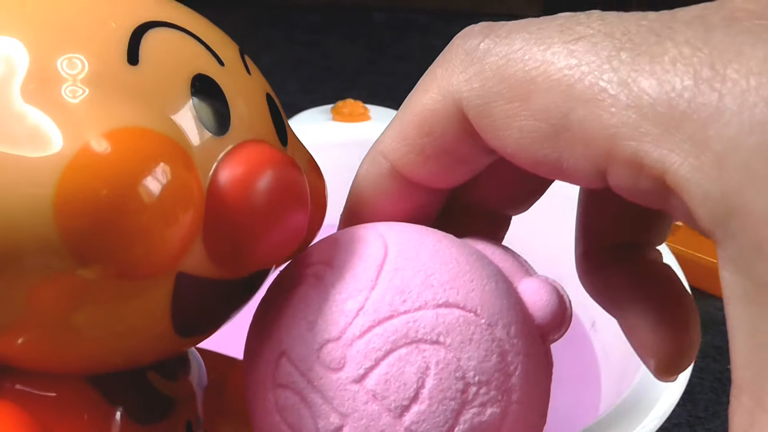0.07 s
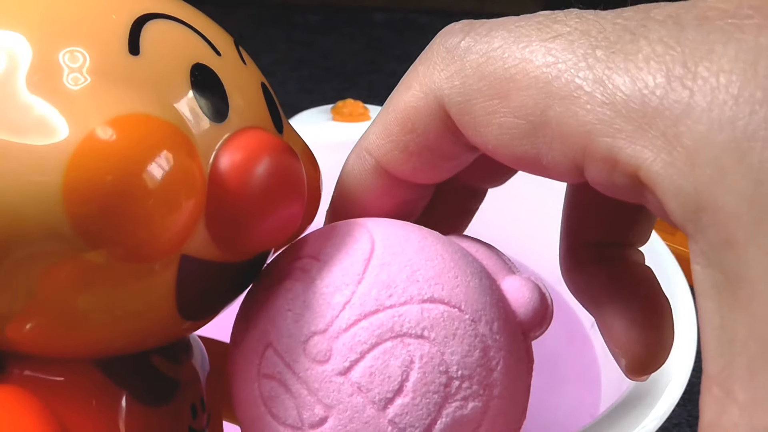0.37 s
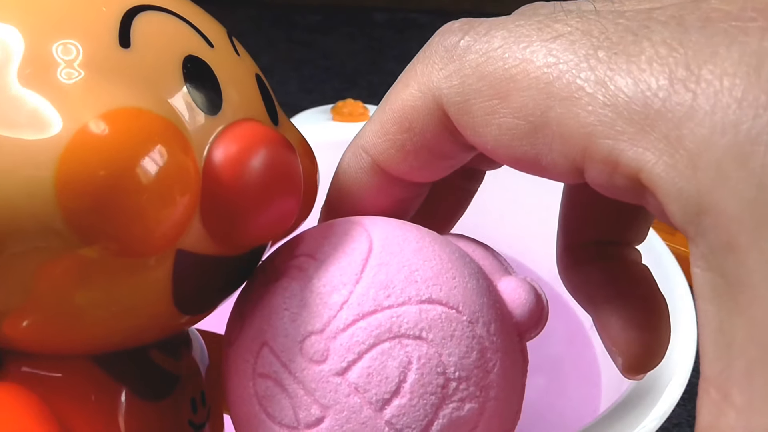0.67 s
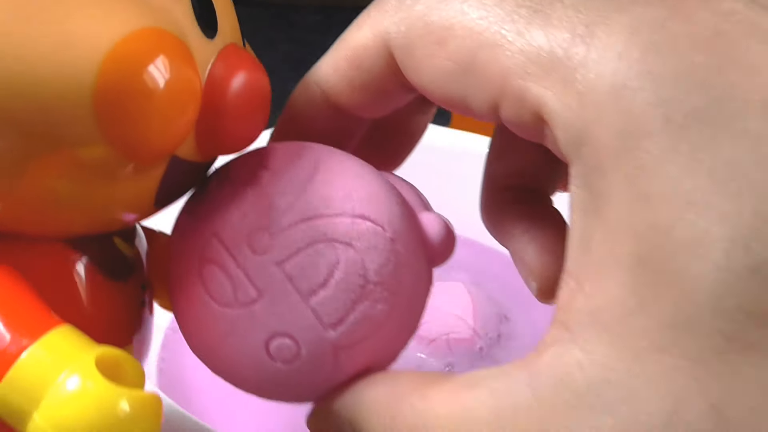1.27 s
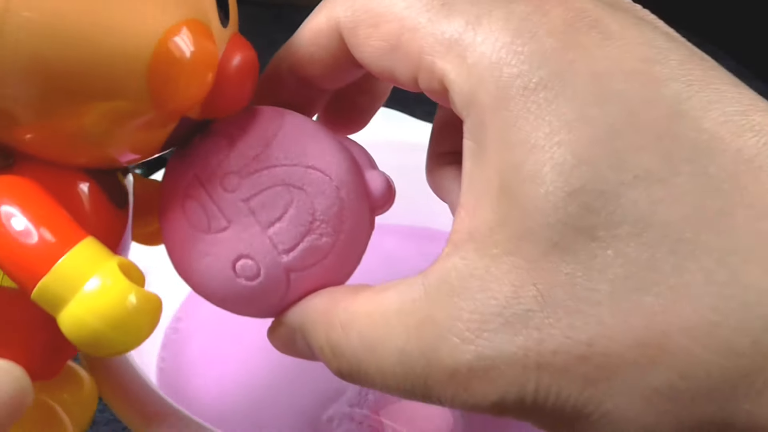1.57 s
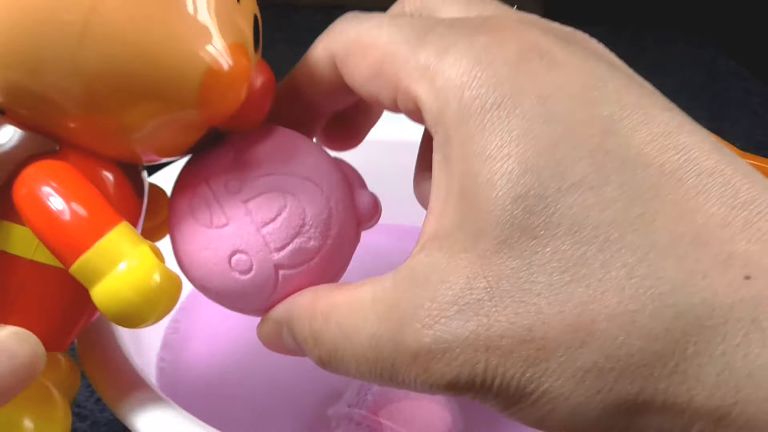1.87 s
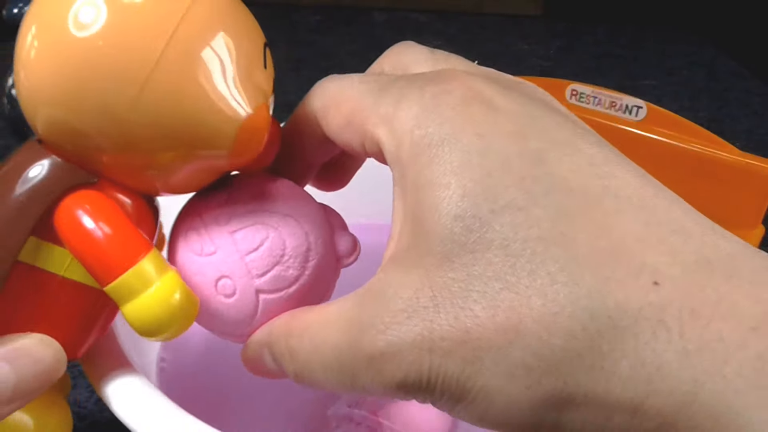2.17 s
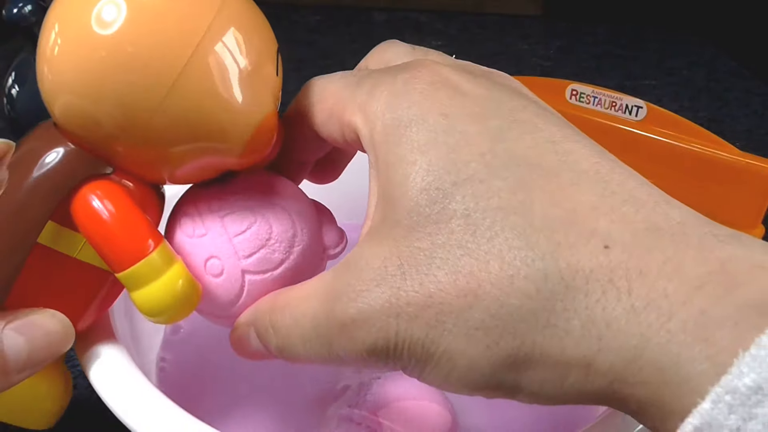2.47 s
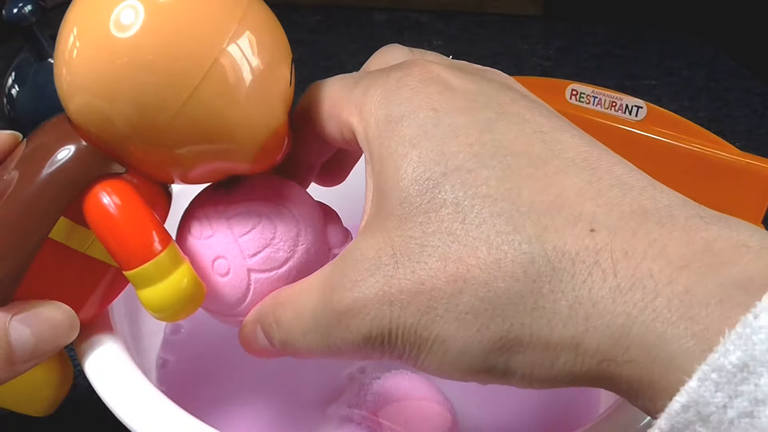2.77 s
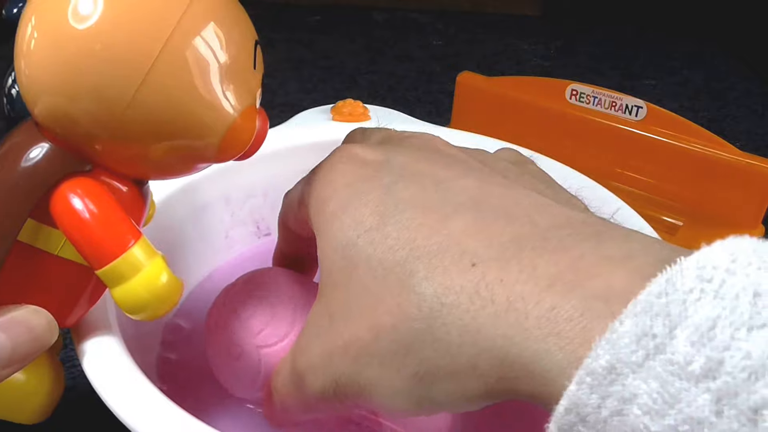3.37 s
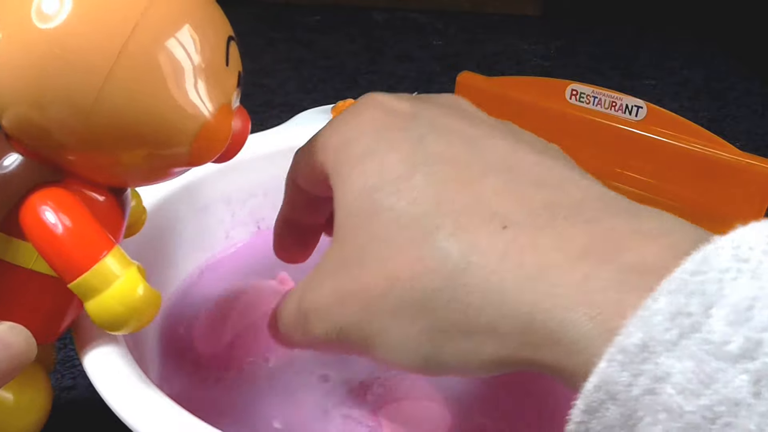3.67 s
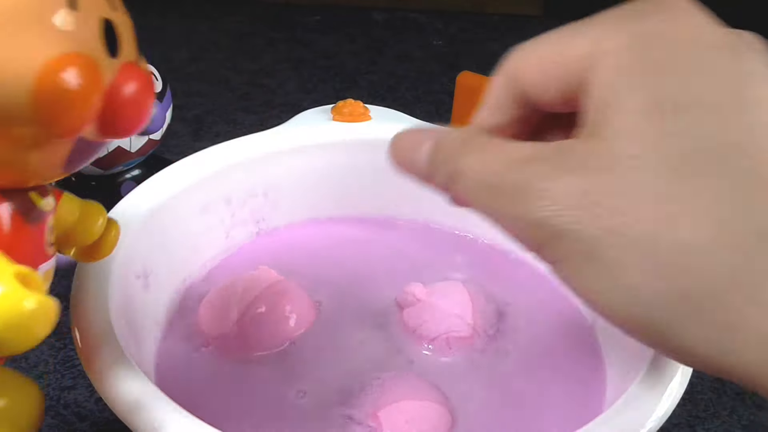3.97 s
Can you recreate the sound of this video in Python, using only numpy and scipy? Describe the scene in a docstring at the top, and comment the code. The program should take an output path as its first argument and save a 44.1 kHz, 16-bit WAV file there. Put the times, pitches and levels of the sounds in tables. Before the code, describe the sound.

A bath bomb fizzes in a small plastic tub throughout, a close, steady hiss over faint room rumble. A second bomb taps a hollow plastic toy at about 0.1 and 1.6 seconds, more faintly at 0.4 and 2.5. The tub is bumped at 2.2. At 3.7 the bomb plops through shallow water, thuds on the bottom and bounces twice quickly as the fizz brightens slightly.

```python
"""Bath bomb in a toy tub

Close to the microphone, a bath bomb fizzes in a small plastic tub: countless tiny bubbles burst, and
the hollow of the tub colours their hiss. A hand taps a second bomb against a plastic figure, bumps
the tub, then lets the bomb go: it plops through the shallow water onto the bottom and bounces twice."""
import sys
import numpy as np
from scipy import signal
from scipy.fft import rfft, irfft
from scipy.io import wavfile

SR = 44100
rng = np.random.default_rng(int(sys.argv[2]) if len(sys.argv) > 2 else 0)


def wav_out(sig):
    """Save sig, one row per channel (or a flat mono array), as 16-bit PCM at SR to the path in sys.argv[1]."""
    wavfile.write(sys.argv[1], SR, np.round(np.clip(np.atleast_2d(sig).T, -1, 1) * 32767).astype(np.int16))


N = 176400
T = np.arange(N) / SR
HZ = np.maximum(np.fft.rfftfreq(N, 1 / SR), 1)
SIDES = np.array([[1], [-1]])  # left, right


def amp(db):
    """Decibels to gain."""
    return 10 ** (np.asarray(db) / 20)


def unit(x):
    """Scale to rms 1."""
    return x / np.sqrt(np.mean(x ** 2) + 1e-20)


def in_time(rows):
    """Each column of a curve at every sample."""
    times, *columns = np.transpose(rows)
    return [np.interp(T, times, column) for column in columns]


def per_hz(points):
    """A table joined by straight lines over log frequency."""
    hz, value = np.transpose(points)
    return np.interp(np.log(HZ), np.log(hz), value)


def butter(x, hz, kind, order=2):
    """Causal low- or high-pass."""
    return signal.sosfilt(signal.butter(order, hz, kind, fs=SR, output="sos"), x)


def resonate(x, hz, width_hz):
    """Two-pole band-pass."""
    radius = np.exp(-np.pi * width_hz / SR)
    return signal.lfilter([1, 0, -1], [1, -2 * radius * np.cos(2 * np.pi * hz / SR), radius * radius], x)


def shelf(x, gain_db, above_hz):
    """Raise or lower everything above a frequency by a changing gain."""
    highs = irfft(rfft(x) / (1 + (above_hz / HZ) ** 10), N)
    return x + (amp(gain_db) - 1) * highs


def stereo(mid, side, colour, side_db, balance_db):
    """Two unrelated signals become a coloured left and right of joint rms 1."""
    both = (rfft(mid) + SIDES * amp(side_db) * rfft(side)) / np.hypot(1, amp(side_db))
    gain = amp(per_hz(colour) + SIDES * balance_db / 2)
    return unit(irfft(both * gain, N))


def room_tone(level_db=-52):
    """The room behind the tub: a low, steady rumble."""
    # spectrum of the rumble: frequency_hz, relative_db
    colour = [(20, -23), (45, -9.5), (85, -6.5), (140, -2.5), (210, 0.5), (330, -3.5), (420, -11.5),
              (700, -3.5), (1400, -14), (3000, -32)]
    mid, side = rng.standard_normal((2, N))
    return amp(level_db) * stereo(mid, side, colour, side_db=-6.5, balance_db=-1.2)


def room_echo(x, send_db=-10.5, t60_s=0.13, top_hz=2500):
    """The room answers with a short, dull tail, different on each side."""
    t = T[:SR // 2]
    reflections = butter(rng.standard_normal((2, len(t))), top_hz, "low")
    fade = np.exp(-np.log(1000) * t / t60_s)
    tail = reflections * fade / np.linalg.norm(fade)
    return signal.fftconvolve(amp(send_db) * x, tail, axes=1)[:, :N]


def crust_tick(t, decay_s=0.0015):
    """The bomb's gritty crust touches plastic: a very short burst of noise."""
    # spectrum of the contact: frequency_hz, relative_db
    colour = [(600, -21), (1500, 5), (2300, -4.5), (2800, -16.5), (3500, -7), (4300, 6), (5300, -8),
              (8000, -5.5), (12000, -17), (16000, -28)]
    grit = irfft(rfft(rng.standard_normal(N)) * amp(per_hz(colour)), N)
    return unit(grit[:len(t)]) * np.exp(-t / decay_s)


def mode(t, hz, t60_s, swell_s):
    """A mode swells as the contact presses on, then dies away."""
    swell = 1 - np.exp(-t / swell_s)
    fade = np.exp(-np.log(1000) * t / t60_s)
    return swell * fade * np.sin(2 * np.pi * hz * t)


def knocks(blows, modes, registers_hz, bass_cut_hz=167):
    """Each blow is a tick and the body's modes, weighted by register according to where it lands."""
    track = np.zeros((2, N + SR))
    t = T[:SR // 2]
    for start_s, *register_db, tick_db, swell_s in blows:
        hit = amp(tick_db) * crust_tick(t)
        for hz, mode_db, t60_s, *balance_db in modes:
            strength_db = np.interp(np.log(hz), np.log(registers_hz), register_db)
            pan_db = SIDES * sum(balance_db) / 2  # centred when a mode has no balance
            hit = hit + amp(mode_db + strength_db + pan_db) * mode(t, hz, t60_s, swell_s)
        start = int(start_s * SR)
        track[:, start:start + len(t)] += hit
    return butter(track[:, :N], bass_cut_hz, "high", order=5)


def figure_taps():
    """The second bomb taps the hollow plastic figure, which rings briefly."""
    # taps: start_s, gain_db in each of five registers, tick_db, swell_s
    taps = [(.0738, -22.5, -28, -41, -20.5, -37, -27, 0.00034),
            (.399, -36, -36.5, -55, -50, -50, -55, 0.0014),
            (1.647, -21.5, -30, -18, -31, -18.5, -38, 0.00072),
            (2.519, -41, -45, -28, -39, -50, -50, 0.0011)]
    # modes of the figure: pitch_hz, relative_db, t60_s
    modes = [(143, -7, 0.063), (223, -7.5, 0.05), (341, -1.5, 0.038), (453, -3.5, 0.041),
             (740, -0.5, 0.019), (830, -4.5, 0.028), (1020, -3.5, 0.023), (1192, 3.5, 0.017),
             (1840, -2, 0.026)]
    # centres of the registers: pitch_hz
    registers_hz = [190, 354, 780, 1020, 1135]
    return knocks(taps, modes, registers_hz)


def tub_knocks():
    """The tub thuds as the hand bumps it, then as the bomb lands and bounces twice."""
    # blows: start_s, gain_db in each of five registers, tick_db, swell_s
    blows = [(2.2069, -18.5, -58, -9, -18, -16, -18, 0.0026),
             (3.6812, -6, -5.5, -40, -27, -14.5, -14, 0.0017),
             (3.6866, -27, -9.5, -6.5, -29, -9, -45, 0.0017), (3.7888, -14, -17, -23, -8, -25, -43, 0.0011),
             (3.8486, -23.5, -23, -26, -22, -38, -50, 0.0021)]
    # modes of the water-filled tub: pitch_hz, relative_db, t60_s, left_minus_right_db
    modes = [(143, 7, 0.06, -3), (187.2, -5.5, 0.16, -2), (215, -11.5, 0.16, -2), (253, -9, 0.056, -7),
             (326.5, -12.5, 0.13, -3), (370, -12.5, 0.056, -3), (459, -22, 0.18, -10), (527, -14, 0.056, 0),
             (662, -10.5, 0.077, -4), (729, 1.5, 0.024, 4), (767, -5.5, 0.034, -2), (816, -9.5, 0.057, 3),
             (1192, -9, 0.024, 3), (1740, -32, 0.039, 5)]
    # centres of the registers: pitch_hz
    registers_hz = [176, 367, 778, 830, 1200]
    return knocks(blows, modes, registers_hz)


def pops(per_s=250000, spread_db=0.5):
    """Tiny bubbles burst at random, several to a sample: many faint, a few stronger."""
    count = rng.poisson(per_s / SR, N)
    bursts = np.sqrt(count) * rng.standard_normal(N)
    return bursts * amp(spread_db * np.minimum(rng.exponential(1, N), 6))


def hollow(side_db=-16, cup_hz=1850, cup_width_hz=180):
    """The bursts ring in the air of the tub and under the cupped hand."""
    # air resonances of the tub: pitch_hz, width_hz, rms_db
    air_modes = [(730, 325, -54), (825, 46, -52.5), (1246, 210, -52.5)]
    # resonance under the hand: time_s, rms_db
    cup_levels = [(0, -51), (1.1, -53), (1.5, -48.5), (1.9, -46), (2.3, -51.5), (3, -54.5), (4, -54.5)]
    bursts = pops() + amp(side_db) * pops() * SIDES
    tub_air = sum((-1) ** k * amp(db) * unit(resonate(bursts, hz, width_hz))  # alternating polarity
                  for k, (hz, width_hz, db) in enumerate(air_modes))
    cup_db, = in_time(cup_levels)
    return tub_air + amp(cup_db) * unit(resonate(pops(), cup_hz, cup_width_hz))


def fizz():
    """Close to the microphone, the bursts merge into a hiss, brighter as the hand uncovers the water."""
    # strength of the fizz: time_s, level_db, upper_shelf_db, treble_shelf_db
    strength = [(0, -34, -1.5, 0.8), (.6, -34.6, -1, -0.5), (1.15, -34.5, -1, -0.3), (1.5, -35, 0.9, 0.5),
                (1.85, -34, 0.2, 1.5), (2.4, -34, -0.1, 0.9), (3.1, -33.5, 0.4, 0.5), (3.6, -34, 0.2, .8),
                (4, -33.5, 1.5, 2.5)]
    # spectrum of the bursting bubbles: frequency_hz, relative_db
    colour = [(300, -41), (1000, -27), (1600, -14.5), (2300, -10), (2700, -16.5), (3000, -10),
              (3280, -10.5), (3700, -2.5), (4600, -3.1), (5400, -1), (6700, -2), (8300, -5), (10500, -11.5),
              (12000, -14), (13300, -16.5), (16000, -19)]
    # stereo width: frequency_hz, side_minus_mid_db
    width = [(1000, -2), (3500, -33.5), (5000, -24), (7900, -28), (8600, -11), (10500, -5.5), (13000, -6.5),
             (16000, -4)]
    # lean to one side: frequency_hz, left_minus_right_db
    balance = [(8000, 0), (10000, -2), (11600, -6.5), (13200, 3), (15200, 0)]
    level_db, upper_db, treble_db = in_time(strength)
    hiss = stereo(pops(), pops(), colour, per_hz(width), per_hz(balance))
    hiss = shelf(hiss, upper_db, above_hz=4830)
    hiss = shelf(hiss, treble_db, above_hz=7800)
    return amp(level_db) * hiss


def scene():
    """Fizz and knocks up close, the room behind; only the knocks get an echo."""
    blows = tub_knocks() + figure_taps()
    return fizz() + hollow() + room_tone() + blows + room_echo(blows)


def record(dry):
    """The very top of the treble is cut steeply."""
    cutoff_hz = 15850
    return irfft(rfft(dry) / np.sqrt(1 + (HZ / cutoff_hz) ** 500), N)


dry = scene()
out = record(dry)
wav_out(out)
```